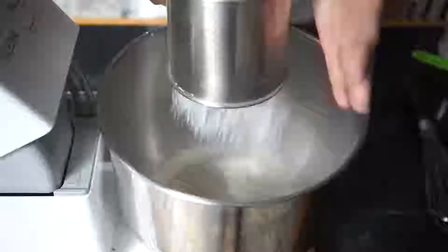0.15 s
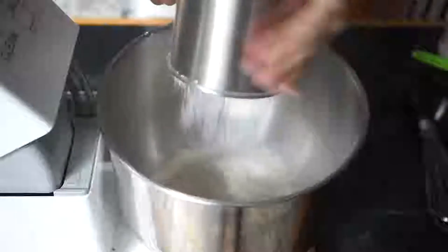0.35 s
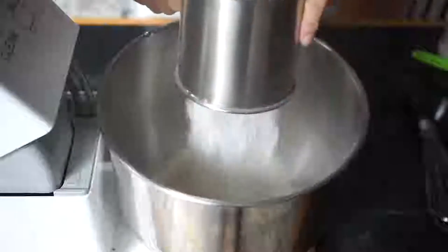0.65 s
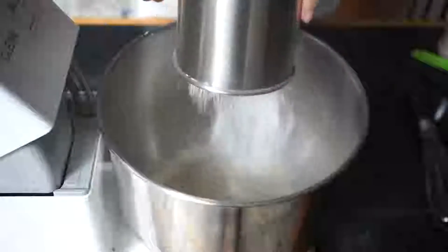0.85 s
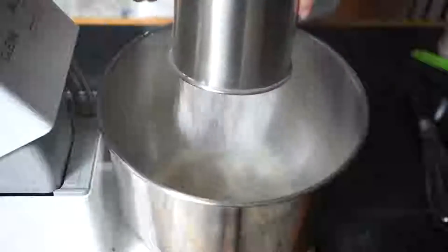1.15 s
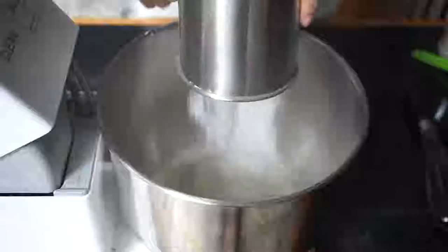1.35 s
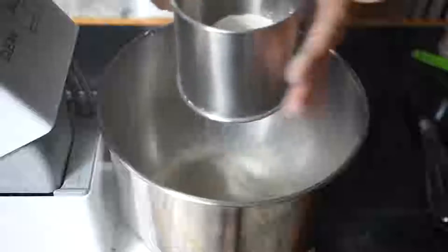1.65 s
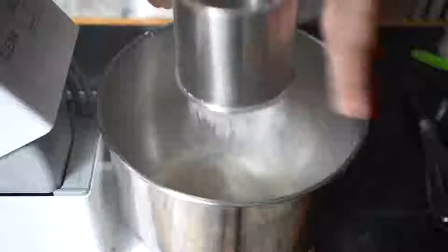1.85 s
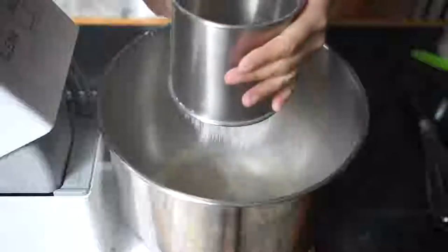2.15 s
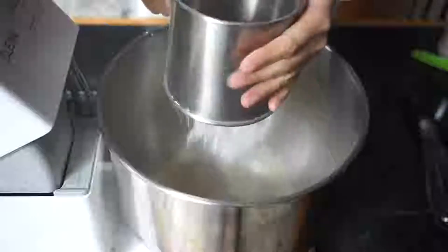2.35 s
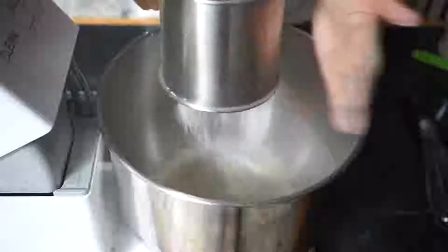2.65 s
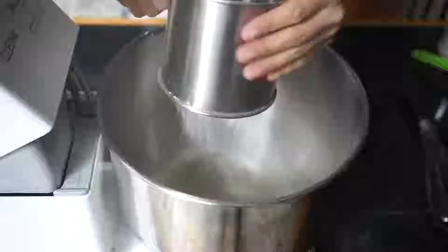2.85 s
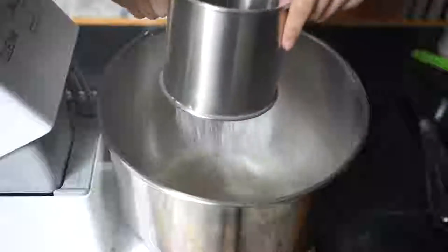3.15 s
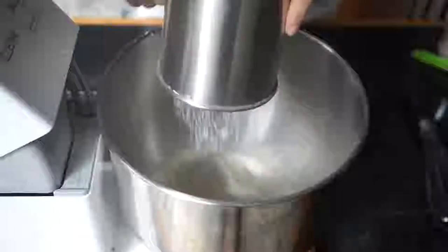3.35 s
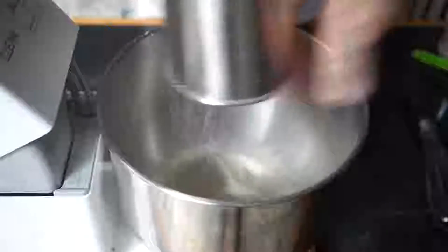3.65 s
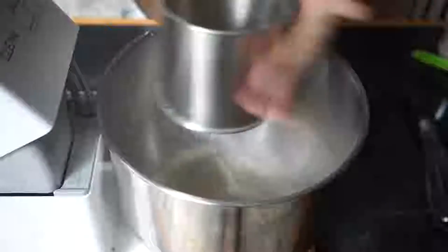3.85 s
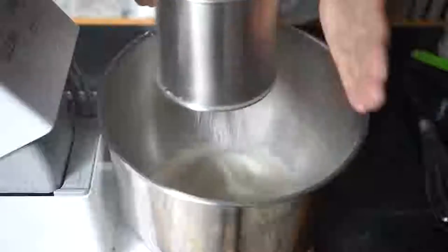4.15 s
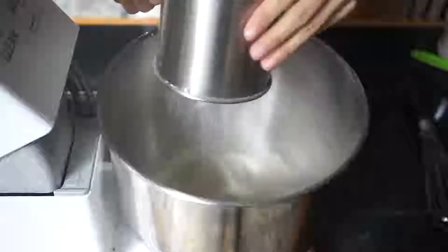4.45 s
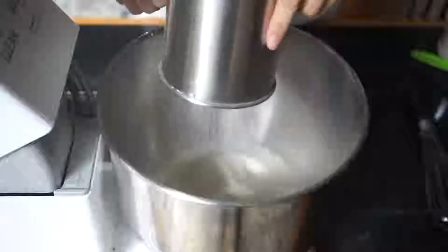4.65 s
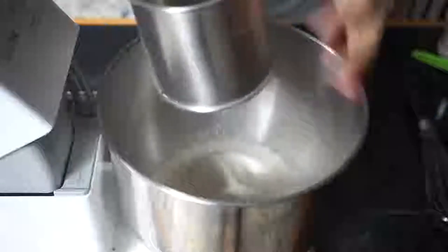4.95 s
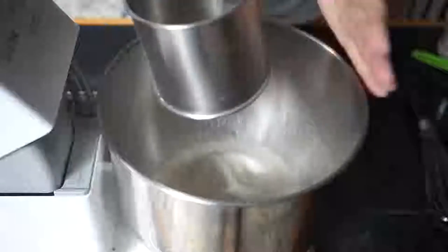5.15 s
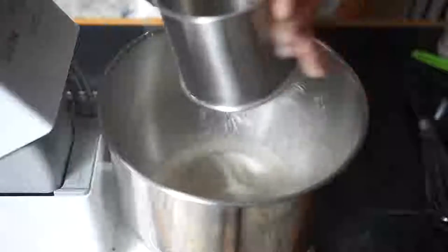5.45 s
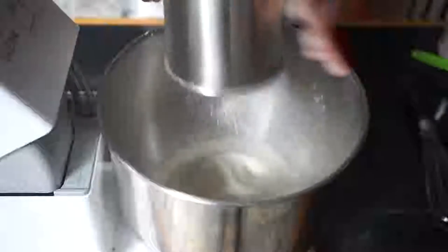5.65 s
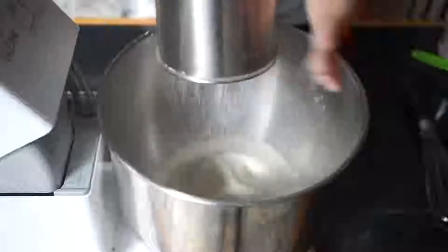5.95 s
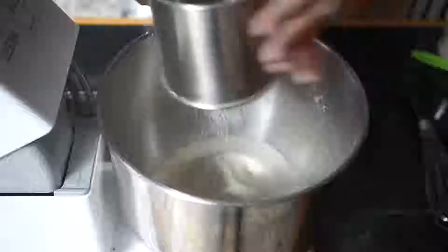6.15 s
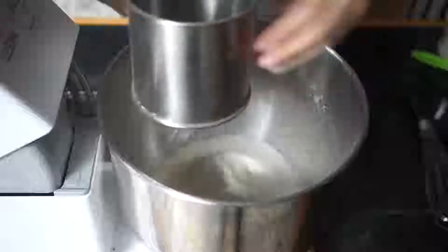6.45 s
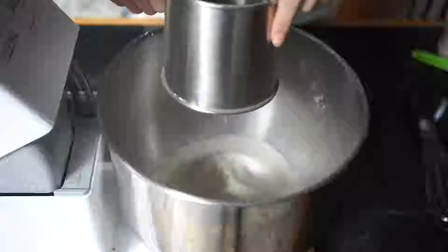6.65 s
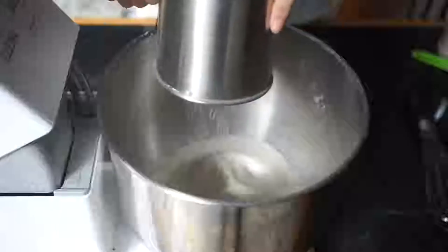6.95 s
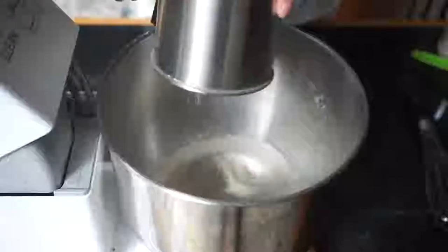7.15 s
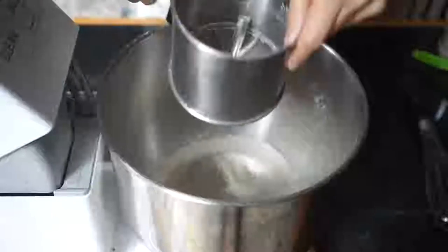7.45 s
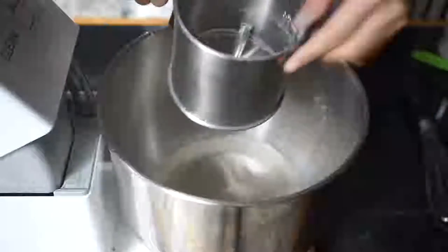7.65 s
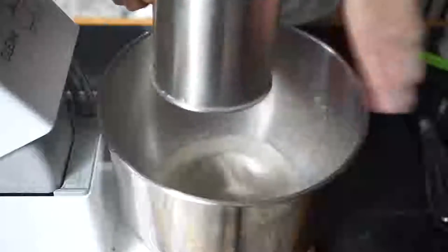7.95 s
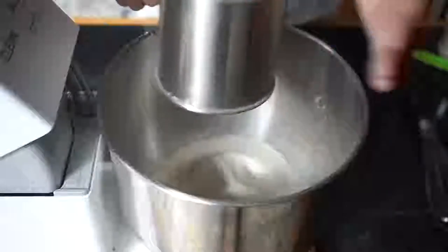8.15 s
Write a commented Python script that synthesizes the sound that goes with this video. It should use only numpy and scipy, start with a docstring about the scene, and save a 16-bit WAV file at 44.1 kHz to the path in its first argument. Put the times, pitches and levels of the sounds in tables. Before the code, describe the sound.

Rapid raspy wire-on-mesh sweeps and short tinny clanks alternate with loud hand slaps on a metal sifter over a bowl, with faint room hum.

```python
"""A squeeze-handle steel flour sifter is worked over a mixing bowl in a hard-walled kitchen.
Squeezes and releases drag the wire agitator over the mesh in gritty sweeps, most ending in a clank on the stop.
Palm slaps on the cup are ragged noise cracks with a low thump; ticks are noise sparks and bumps are soft knocks.
Underneath lie filtered noises: a wavering hum, an uneven rumble and steady room noise."""
import sys
import numpy as np
from scipy import signal
from scipy.fft import rfft, irfft
from scipy.io import wavfile

SR = 44100
rng = np.random.default_rng(int(sys.argv[2]) if len(sys.argv) > 2 else 0)


def materialize(psi):
    """Save the field psi as 16-bit PCM at rate SR to the path in sys.argv[1].

    A 1-D psi becomes a single channel; in a 2-D psi each row is a channel.
    """
    bounded = np.clip(np.atleast_2d(psi).T, -1, 1)
    quanta = np.round(bounded * 32767).astype(np.int16)
    wavfile.write(sys.argv[1], SR, quanta)


N = 365577
T = np.arange(N) / SR   # time in s

# agitator sweeps, level relative to the mesh layer: start_s, rise_s, peak_db
SWEEPS = [(0.0, 0.035, -22), (0.133, 0.044, -26.5), (0.382, 0.018, -27), (.535, 0.028, -23),
          (0.617, .01, -25), (.736, 0.039, -22), (.877, 0.016, -23.5), (1.004, .028, -19),
          (1.09, 0.0099, -22.5), (1.203, 0.036, -20.5), (1.295, 0.012, -23.5), (1.418, 0.03, -19.5),
          (2.026, 0.017, -26), (2.163, .026, -25), (2.231, 0.023, -26), (2.353, 0.032, -22),
          (2.43, 0.022, -30), (2.534, 0.03, -28), (2.741, .045, -20.5), (2.898, 0.035, -18.5),
          (2.975, 0.018, -24), (3.101, .034, -17.5), (3.195, 0.013, -21), (3.311, 0.033, -16.5),
          (3.41, 0.017, -26.5), (3.5, 0.032, -20.5), (4.33, 0.048, -32.5), (4.488, 0.036, -26),
          (4.57, 0.01, -25.5), (4.691, 0.03, -20), (4.778, 0.0055, -26), (4.871, 0.038, -24.5),
          (5.68, .012, -28.5), (5.823, 0.035, -23.5), (5.907, 0.021, -25.5), (6.028, 0.038, -23.5),
          (6.468, 0.038, -23.5), (6.629, 0.038, -21), (6.718, 0.013, -23.5), (6.845, 0.037, -20),
          (6.93, 0.025, -22.5), (7.062, 0.033, -18.5), (7.187, 0.026, -22), (7.314, 0.032, -18),
          (7.455, 0.037, -22.5), (7.59, 0.029, -18), (7.699, 0.022, -24), (7.816, .031, -18.5),
          (8.165, 0.026, -19.5)]
# the handle hits its stop: start_s, low_cup_modes_db, high_cup_modes_db
CLANKS = [(0.0024, -15, -23), (0.0503, -16.5, -13.5), (0.166, -21.5, -36), (0.409, -23, -18),
          (0.5646, -15, -23.5), (0.6456, -27, -16), (0.7634, -13, -20), (0.9049, -13.5, -15.5),
          (1.0375, -14.5, -39), (1.1172, -11, -10.5), (1.2299, -10.5, -25.5), (1.3236, -13.5, -10.5),
          (1.4534, -14.5, -28), (2.0396, -27, -24.5), (2.266, -20.5, -17.5), (2.3884, -19, -25.5),
          (2.777, -21, -16), (2.9256, -11.5, -30), (3.007, -14.5, -14), (3.1346, -10, -24),
          (3.23, -20, -16), (3.3393, -21, -38), (3.5264, -21, -31), (4.366, -19, -20), (4.6, -24, -22),
          (4.719, -19.5, -40), (4.904, -27, -38), (5.7068, -19, -23), (5.8491, -19.5, -30),
          (5.942, -19.5, -20.5), (6.0583, -22.5, -42), (6.4997, -20, -16.5), (6.6563, -16, -31),
          (6.7479, -25, -17), (6.879, -23, -28), (6.9655, -17, -16), (7.092, -20, -21), (7.222, -9, -13),
          (7.3505, -15.5, -21), (7.4929, -10, -12), (7.615, -23, -27), (7.7401, -6.5, -13),
          (7.8397, -27, -21), (8.196, -9.5, -14)]
# palm on the cup: start_s, crack_db, sizzle_db (re crack), thump_db
SLAPS = [(.1144, -16, -25, -47), (.2853, -14, -25, -46), (1.6716, -15, -14, -40), (1.8448, -13.5, -4, -35),
         (2.0074, -13.5, -12, -41), (2.599, -14, -29, -40), (2.7801, -9.5, -25, -32.5),
         (3.7541, -19.5, -17, -36.5), (3.7617, -17.5, -28, -48), (3.9454, -9, -27, -31.5),
         (4.117, -12, 2, -45.5), (4.2936, -8.5, -30, -34), (5.0907, -9.5, -4, -33.5),
         (5.2967, -11, -32, -33), (5.4793, -9.5, -13, -35.5), (5.6512, -9, -7, -38.5),
         (6.1519, -10, -11, -38), (6.348, -8, -30, -32), (7.887, -10.5, -13, -37.5),
         (8.0849, -8, -8, -34.5)]
# fingertips land just before some slaps: start_s, level_db
FINGERS = [(0.279, -32), (2.003, -21.5), (4.111, -20.5), (5.2938, -20.5), (5.475, -32), (6.3435, -38),
           (7.882, -21)]
# bright ticks and snaps of the spring and wires: start_s, sizzle_db, lower_click_db
TICKS = [(.4444, -25, -46), (.611, -24, -28), (.6614, -24, -37), (0.767, -9.5, -9.5), (.9203, -26, -36),
         (1.0033, -26, -27), (1.03, -17, -9), (1.0464, -17, -26), (1.2032, -22, -23), (1.4182, -25, -21),
         (1.449, -21, -23), (1.9924, -23, -24), (2.0413, -25, -26), (2.0574, -27, -32), (2.164, -21, -27),
         (2.2837, -30, -40), (2.4284, -23, -32), (2.9324, -24, -26), (3.102, -26, -20), (3.1316, -13, -11),
         (3.3119, -26, -20), (3.34, -12, -9.5), (3.4521, -26, -39), (3.5264, -10, -31), (4.487, -32, -29),
         (4.7184, -18, -23), (4.8968, -19, -22), (5.9579, -26, -40), (6.0591, -14, -30), (6.317, -29, -29),
         (6.658, -15, -30), (6.759, -25, -37), (6.8732, -11, -21), (6.8877, -14, -32), (6.9775, -22, -30),
         (7.087, -14, -13), (7.348, -23, -20), (7.6157, -9, -17), (7.8444, -13, -17)]
# dull bumps on bowl or counter: start_s, level_db
BUMPS = [(3.62, -36.5), (3.648, -38), (3.672, -41), (3.798, -44), (3.911, -38), (5.843, -28), (5.912, -35),
         (6.223, -49), (6.369, -42), (6.416, -40)]
# modes of the cup wall: pitch_hz, level_db, t60_s
CUP = [(800, 1, 0.036), (900, 0.5, 0.022), (1106, 0.5, 0.048), (1196, 0.5, 0.046), (1271.5, 4, 0.065),
       (1308, -4, 0.052), (1406, -3, 0.043), (1850, 0, 0.044), (2083, 3, 0.018), (2190, -2.5, 0.029),
       (2309, 3, 0.049), (2600, -18, 0.0087), (2730, -9, 0.015)]
# resonances of the air inside the cup: pitch_hz, t60_s
CUP_AIR = [(1170, 0.017), (2200, 0.012)]
# resonances of mesh and wires: pitch_hz, width_hz, level_db
MESH = [(3290, 250, -9), (3964, 250, -6), (4800, 190, -3), (5020, 470, -6), (5920, 540, -0.5),
        (7890, 550, -2.5), (8420, 530, -1.5), (10080, 200, -7.5)]
# spectrum of a palm crack: pitch_hz, level_db (per Hz)
CRACK = [(290, -16), (500, -7), (1210, -6), (1740, -9), (2120, -4.5), (3980, 1), (7370, -2), (7810, -3),
         (8510, -3), (15300, -11)]
# bowl and cup booming: pitch_hz, level_db, t60_s
THUMP = [(239, -1, 0.26), (278, 9, 0.12), (382, 9.5, 0.057), (417, 4, 0.076), (524, 2.5, 0.1)]
# spectrum of the room noise: pitch_hz, level_db (per Hz)
AIR = [(65, -31), (110, -16.5), (275, -7), (409, -7.5), (536, -17), (660, -14), (1260, -11), (1580, -27),
       (6010, -15.5), (14100, -31), (16000, -52)]
# wavering hum lines: pitch_hz, width_hz, level_db
HUM = [(49.5, 12, -63.5), (78.6, 12, -70), (99.4, 6.1, -61.5), (195, 11, -63), (233.6, 12, -65.5)]
# the low rumble swells and sinks: time_s, level_db
RUMBLE = [(0.0, -40), (0.18, -54.5), (1.01, -50.5), (1.85, -56.5), (4.09, -49.5), (4.15, -63), (6.0, -57),
          (6.05, -48), (6.44, -58.5), (7.48, -57.5), (8.01, -48), (8.29, -78)]
# spectrum of the rumble: pitch_hz, level_db (per Hz)
RUMBLE_COLOUR = [(12, -38), (20, -4), (43, 4), (70, -5.5), (93, -1), (124, -7.5), (150, -5.5), (200, -42),
                 (330, -120)]
# how long the kitchen rings: pitch_hz, t60_s
ROOM_T60 = [(200, 0.5), (530, 0.26), (1400, 0.5), (3700, 0.38), (9700, 0.33), (16000, 0.32)]
# likeness of left and right: pitch_hz, likeness (0 to 1)
LIKENESS = [(100, 0.8), (600, 0.85), (1400, 0.63), (3000, 0.057), (8000, 0.033), (16000, 0.19)]
# glints off bowl and counter: pitch_hz, side_db (re mid)
WIDTH = [(100, -36), (600, -18), (1400, -14.5), (3000, -7.5), (8000, -5), (16000, -2)]
# colour difference of the two ports: pitch_hz, left_minus_right_db
LEFT_LEAD = [(60, -1.5), (130, 2), (290, 0), (640, 0.5), (1410, 0), (3100, 0.0), (6820, -2), (15000, 2.0)]

AIR_DB, RUMBLE_WAVER_DB = -51.5, 1.5
ROOM_DB, ROOM_GAP_S = -5, 0.012   # reflections: level, and time to swell in
CUTOFF_HZ = 15900
BUMP_HZ, BUMP_T60_S = 230.6, 0.15
# hollow of the palm, a little different each time (log spread); swell of the contact
PALM_HZ, PALM_SPREAD, CONTACT_S = 400, 0.08, 0.0017
SLAP_FLOUR_DB, SLAP_CUP_DB, SLAP_TO_WALLS_DB = -15, -41, 23.5   # re crack
BOOM_DB = -36.5   # low modes re thump
# how a clank reaches the cup wall and the air in it
WALL_LOW_DB, WALL_HIGH_DB, AIR_LOW_DB, AIR_HIGH_DB = -35, -46, -24.5, -14
SWEEP_START_DB = -34   # every sweep sets off at the same level
RUN_ON_S, RUN_ON_PER_RISE = 0.021, -0.36   # the wires run on after the peak, the shorter the longer the rise
RUN_ON_LOSS_DB, STOP_S, STOP_LOSS_DB = 7.5, 0.043, 33
SIZZLE_DB, CUP_DB, WIRE_DB = -6.5, -5, -12.5   # re mesh level
WIRE_HZ, WIRE_SPREAD = 6220, 0.028   # one wire sings, at a slightly new pitch each sweep (log spread)
LOAD_DB, LOAD_DB_PER_S = -16, -2   # dull shove of the flour re mesh level, fading as the cup empties


def amp(db):
    """Decibels to gain."""
    return 10 ** (np.asarray(db) / 20)


def rms_one(x):
    """Scale to an rms of 1."""
    return x / np.sqrt(np.mean(x ** 2) + 1e-20)


def at_hz(points, hz):
    """Read a table's second column between its pitches, on a log pitch axis."""
    pitch_hz, value = np.array(points).T
    return np.interp(np.log(hz), np.log(pitch_hz), value)


def bin_hz():
    """Pitches of the spectrum bins, kept at 1 Hz or more for the log axis."""
    return np.maximum(np.fft.rfftfreq(N, 1 / SR), 1)


def colour(x, points):
    """Shape the spectrum by a table of pitch_hz, level_db."""
    return irfft(rfft(x) * amp(at_hz(points, bin_hz())), N)


def band(x, low_hz, high_hz):
    """Keep one band of the sound."""
    return signal.sosfilt(signal.butter(2, [low_hz, high_hz], "band", fs=SR, output="sos"), x)


def thin(x, edge_hz):
    """Small thin steel radiates no bass."""
    return signal.sosfilt(signal.butter(4, edge_hz, "high", fs=SR, output="sos"), x)


def ring(x, hz, t60):
    """A two-pole resonance: a unit click sets a sine ringing from about height 1, down 60 dB after t60."""
    r, w = amp(-60 / (t60 * SR)), 2 * np.pi * hz / SR
    return signal.lfilter([0, np.sin(w)], [1, -2 * r * np.cos(w), r * r], x + 1e-18)


def t60_of_width(width_hz):
    """The wider a resonance, the sooner it dies."""
    return np.log(1000) / np.pi / width_hz


def grit(per_s, spread_db):
    """Random clicks of uneven size and either sign; rms 1."""
    sizes = amp(spread_db * np.minimum(rng.exponential(1, N), 4)) * rng.choice([-1, 1], N)
    return rms_one(sizes * (rng.random(N) < per_s / SR))


def bursts(times, levels_db, rises_s, falls_s):
    """Envelope of short contacts: a swell, then an exponential fall."""
    out, t = np.zeros(N), np.arange(6000) / SR
    for s, level_db, rise, fall in np.broadcast(times, levels_db, rises_s, falls_s):
        rise, i = max(rise, 1e-4), round(s * SR)
        shape = np.where(t < rise, (t / rise) ** 2, np.exp(-(t - rise) / max(fall, 1e-4)))
        out[i:i + len(t)] += amp(level_db) * shape[:N - i]
    return out


def knock(times, levels_db, pitches_hz, t60s, contact_s):
    """Soft pushes, each on a resonance of its own."""
    out = np.zeros(N)
    for s, db, hz, t60 in np.broadcast(times, levels_db, pitches_hz, t60s):
        part = slice(round(s * SR), round((s + .4) * SR))
        t = (T[part] - s) / contact_s
        push = amp(db) * t * np.exp(-t) / (contact_s * SR)
        out[part] += ring(push, hz, t60)
    return thin(out, 186)


def stereo_bank(length, shape):
    """Half-octave noise bands for two ears, alike as LIKENESS says, each weighted by shape(hz)."""
    out, edges = 0, 22 * 2 ** np.arange(0, 9.6, .5)
    white = rng.standard_normal((2, 2, length))   # neighbouring bands take turns with two noise pairs
    for k, (low, high) in enumerate(zip(edges, edges[1:])):
        mid, side = band(white[k % 2], low, high)
        hz = np.sqrt(low * high)
        alike = np.clip(at_hz(LIKENESS, hz), 0, 1)
        ears = np.sqrt(1 + alike) * mid + np.sqrt(1 - alike) * side * [[1], [-1]]
        out = out + shape(hz) * ears
    return out


def room_noise():
    """Steady wide noise, coloured band by band."""
    return amp(AIR_DB) * rms_one(stereo_bank(N, lambda hz: amp(at_hz(AIR, hz))))


def hum():
    """Noise through narrow resonances gives tones that waver."""
    return sum(amp(db) * rms_one(ring(rng.standard_normal(N), hz, t60_of_width(width)))
               for hz, width, db in HUM)


def rumble():
    """Low noise, slightly wide, whose level swells and sinks with a random waver on top."""
    waver = np.interp(T, np.linspace(0, N / SR, num=60), rng.standard_normal(60))
    level_db = np.interp(T, *np.transpose(RUMBLE)) + RUMBLE_WAVER_DB * waver
    mid, side = colour(rng.standard_normal((2, N)), RUMBLE_COLOUR + [(400, -60)])   # faint hiss above
    return amp(level_db) * rms_one(mid + amp(-12) * side * [[1], [-1]])


def kitchen(near, walls):
    """Direct sound with glints that differ between the ears, then diffuse reflections that die band by band.
    The sifter keeps moving, so three places in the room take turns."""
    t, out = np.arange(SR // 2) / SR, near * [[1], [1]]
    for place in range(3):
        share = np.cos(np.pi * (T * 1.9 + place / 3)) ** 2 / np.sqrt(9 / 8)
        glint = near * share
        for lag in rng.integers(10, 70, size=4):   # all-pass echoes smear the glint
            echo = np.r_[1, np.zeros(lag), .6]
            glint = signal.lfilter(echo[::-1], echo, glint)
        out += colour(glint, WIDTH) * [[1], [-1]]
        tail = stereo_bank(len(t), lambda hz: amp(-60 * t / at_hz(ROOM_T60, hz)))
        tail = tail * np.minimum(t / ROOM_GAP_S, 1) ** 2
        tail = amp(ROOM_DB) * rms_one(tail) / np.sqrt(len(t))
        out += signal.fftconvolve(walls[None] * share, tail, axes=1)[:, :N]
    return out


def bumps():
    """Dull soft pushes on one low resonance, slower than the slaps."""
    return knock(*np.transpose(BUMPS), BUMP_HZ, BUMP_T60_S, 0.00035)


def ticks():
    """Sparks of noise a few milliseconds long."""
    s, sizzle_db, click_db = np.transpose(TICKS)
    white = rng.standard_normal(N)
    sizzle = band(white, 8300, 19000) * bursts(s, sizzle_db, 0.00095, 0.0026)
    click = band(white, 3000, 8600) * bursts(s, click_db, 0.00054, 0.0048)
    return sizzle + click


def boom(s, push_db):
    """Soft pushes set the low modes going, each with its own strength."""
    out = 0
    for hz, db, t60 in THUMP:
        blow_db = push_db + db + 4 * rng.standard_normal(len(s))
        out = out + ring(bursts(s, blow_db, 0.0005, 0.00023), hz, t60)
    return thin(out, 188)


def slaps():
    """The palm lands in a ragged crack, shakes the flour and thumps the vessel.
    Gives the body, the crack as heard close by, and the crack summed over all directions, an even click, for the walls."""
    s, crack_db, sizzle_db, thump_db = np.transpose(SLAPS)
    skin = grit(9000, 4.0)
    palm_hz = PALM_HZ * np.exp(PALM_SPREAD * rng.standard_normal(len(s)))
    contact = bursts(s - .001, crack_db, CONTACT_S, 0.004)
    fingers = bursts(*np.transpose(FINGERS), 0.0011, 0.0026)
    crack = rms_one(colour(skin, CRACK)) * (contact + fingers)
    crack += band(skin, 5700, 19500) * bursts(s - .001, crack_db + sizzle_db, CONTACT_S, 0.0011)

    flour = rms_one(colour(grit(12000, 1.4), CRACK)) * bursts(s, crack_db + SLAP_FLOUR_DB, 0.0028, 0.015)
    blow = bursts(s, crack_db, 0.0016, 0.0034) * skin
    cup = sum(amp(db + SLAP_CUP_DB) * ring(blow, hz, t60) for hz, db, t60 in CUP)
    thump = knock(s, thump_db, palm_hz, 0.13, 0.00032) + boom(s, thump_db + BOOM_DB)
    body = flour + thump + thin(cup, 830)

    clicks = np.zeros(N)
    clicks[np.round(s * SR).astype(int)] = amp(crack_db + SLAP_TO_WALLS_DB)
    return body, crack, colour(clicks, CRACK)


def clanks():
    """A rattle of a few milliseconds strikes every cup mode with its own strength; the air in the cup answers briefly."""
    s, low_db, high_db = np.transpose(CLANKS)
    out, rattle = 0, grit(8000, 3.36)
    for hz, db, t60 in CUP:
        wall_db = low_db + WALL_LOW_DB if hz < 1600 else high_db + WALL_HIGH_DB
        blow_db = wall_db + db + 3 * rng.standard_normal(len(s))
        out = out + ring(bursts(s - .001, blow_db, 0.00068, 0.0044) * rattle, hz, t60)
    for (hz, t60), level_db in zip(CUP_AIR, (low_db + AIR_LOW_DB, high_db + AIR_HIGH_DB)):
        out = out + ring(bursts(s - .001, level_db, 0.0017, 0.0035) * rattle, hz, t60)
    return thin(thin(out, 772), 772)


def sweeps():
    """The wires tick over thousands of mesh strands a second, ringing mesh and cup; pressure grows, then the wires stop."""
    strands = grit(7000, 1.85)
    mesh, singing = np.zeros((2, N))
    for (s, rise, peak_db), chance in zip(SWEEPS, rng.standard_normal(len(SWEEPS))):
        part = slice(round(s * SR), round((s + .15) * SR))
        t = T[part] - s
        end = rise + max(RUN_ON_S + RUN_ON_PER_RISE * rise, .001)
        end_db = peak_db - RUN_ON_LOSS_DB
        level_db = np.interp(t, [0, rise, end, end + STOP_S],
                             [SWEEP_START_DB, peak_db, end_db, end_db - STOP_LOSS_DB])
        level = amp(level_db) * np.minimum(t / 0.00059, 1)   # sub-millisecond onset
        mesh[part] += level
        wire_hz = WIRE_HZ * np.exp(WIRE_SPREAD * chance)
        singing[part] += amp(WIRE_DB) * rms_one(ring(strands[part], wire_hz, 0.0067)) * level
    cup = amp(CUP_DB) * mesh * strands   # the cup is driven by the smooth level

    catching = amp(1.45 * rms_one(band(rng.standard_normal(N), 29, 257)))   # the wires catch and slip
    mesh, singing = mesh * catching, singing * catching
    wires = 0
    for k, (hz, width, db) in enumerate(MESH):   # neighbours in opposite polarity
        wires = wires + (-1) ** k * amp(db) * np.sqrt(width) * ring(strands, hz, t60_of_width(width))
    broad = amp(-2) * rms_one(wires) + amp(0.5) * rms_one(band(grit(5000, 2.93), 890, 8430))
    sizzle = amp(SIZZLE_DB) * rms_one(band(strands, 8900, 15600))
    load = amp(LOAD_DB + LOAD_DB_PER_S * T) * rms_one(band(strands, 287, 673))

    wall = sum(amp(db) * ring(cup, hz, t60) for hz, db, t60 in CUP)
    wall += sum(amp(1.5) * ring(cup, hz, t60) for hz, t60 in CUP_AIR)
    return amp(-3.0) * (mesh * (broad + sizzle + load) + singing) + amp(-35.0) * thin(wall, 622)


def scene():
    """The sifter plays into the kitchen, over the steady background."""
    body, crack, crack_to_walls = slaps()
    sifter = sweeps() + clanks() + body + bumps() + ticks()
    background = room_noise() + hum() + rumble()
    return kitchen(sifter + crack, sifter + crack_to_walls) + background


def record(dry):
    """The two ports differ a little in colour; peaks clip, the top is cut."""
    lead = amp(at_hz(LEFT_LEAD, bin_hz()) / 2)   # half the difference on each side
    ports = irfft(rfft(dry) * [lead, 1 / lead], N)
    top_cut = signal.cheby2(20, 80, CUTOFF_HZ * 1.04, fs=SR, output="sos")   # 80 dB down just above the cutoff
    return signal.sosfilt(top_cut, np.clip(ports, -1, 1))


dry = scene()
out = record(dry)
materialize(out)
```